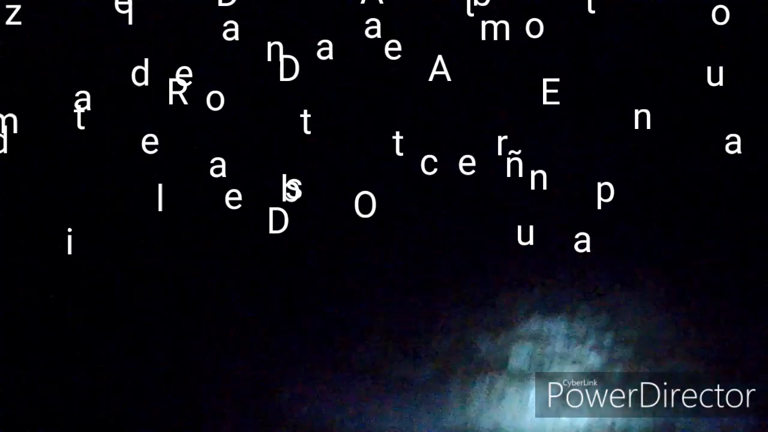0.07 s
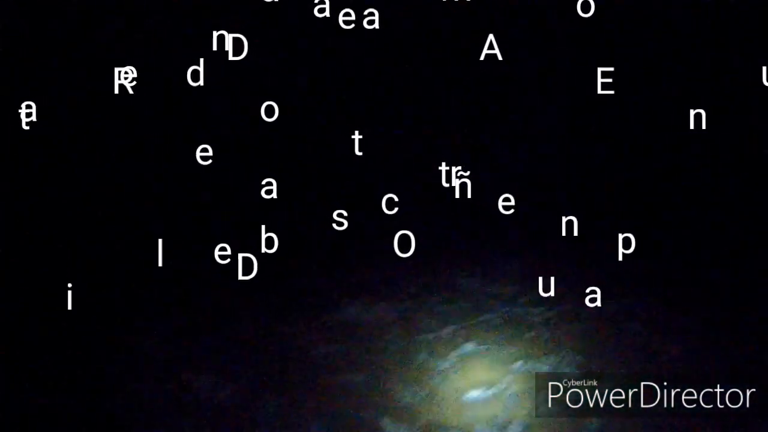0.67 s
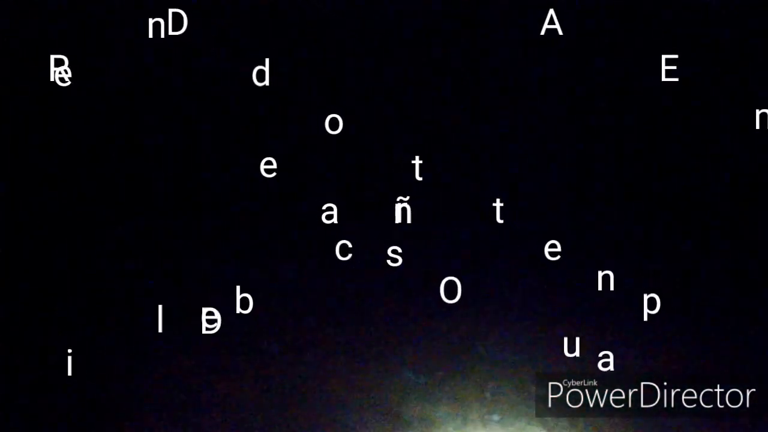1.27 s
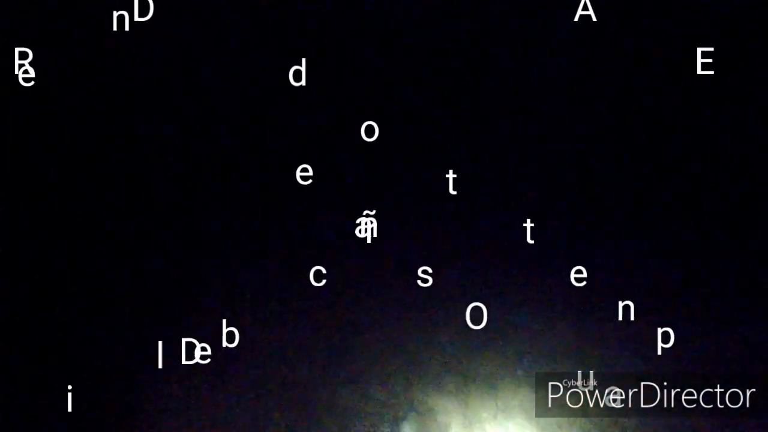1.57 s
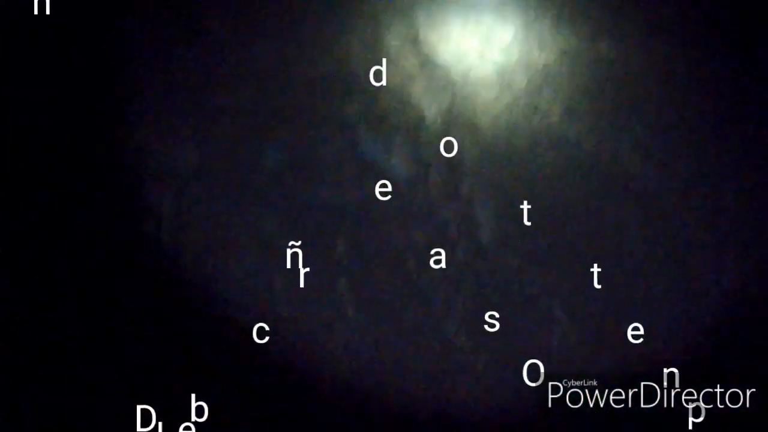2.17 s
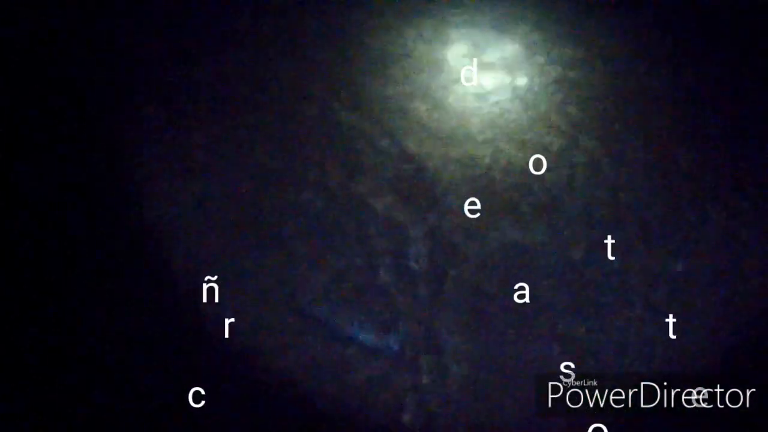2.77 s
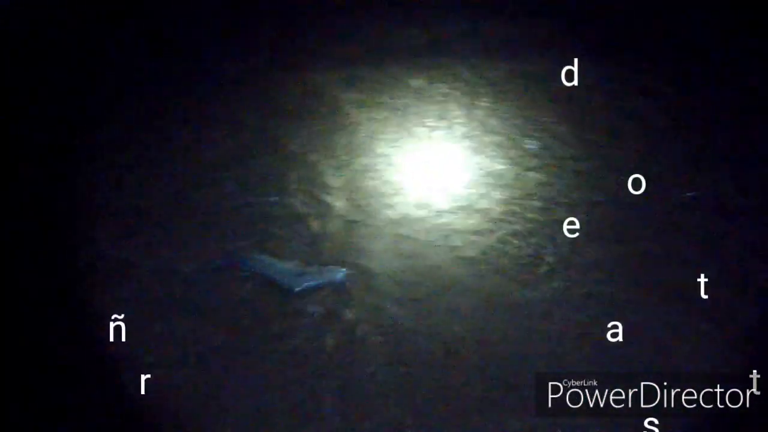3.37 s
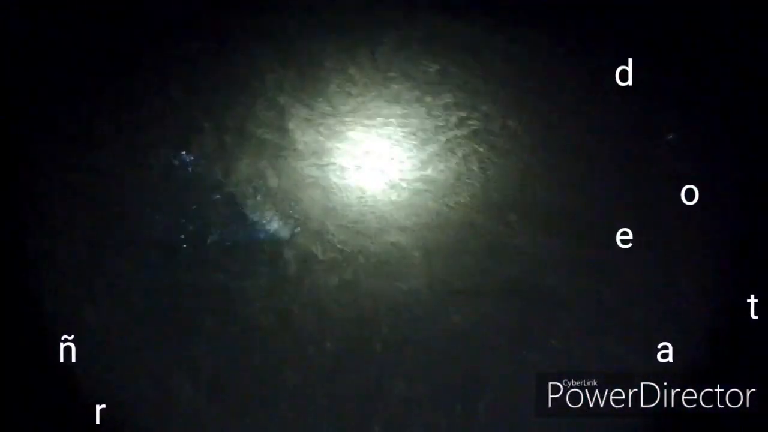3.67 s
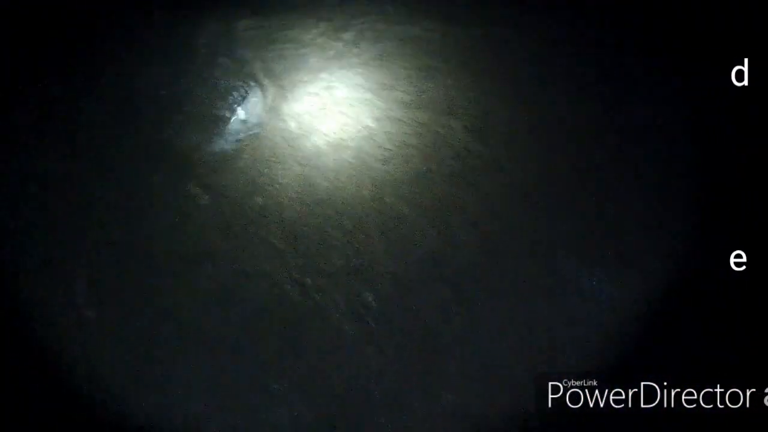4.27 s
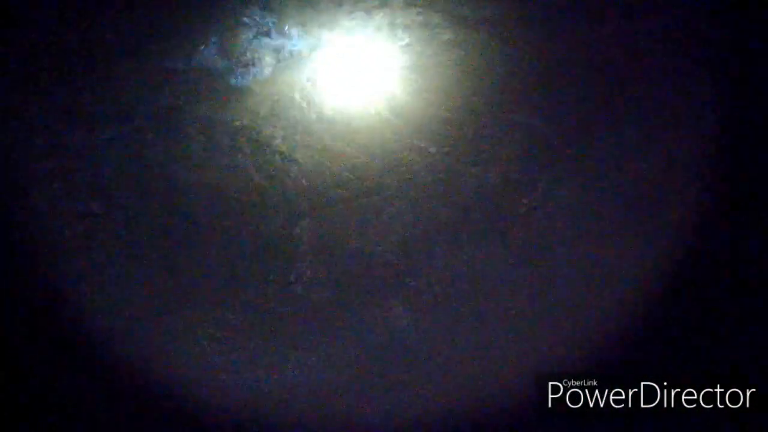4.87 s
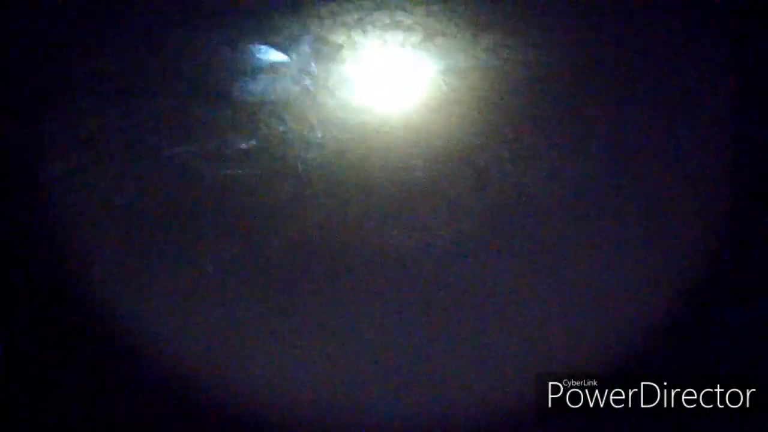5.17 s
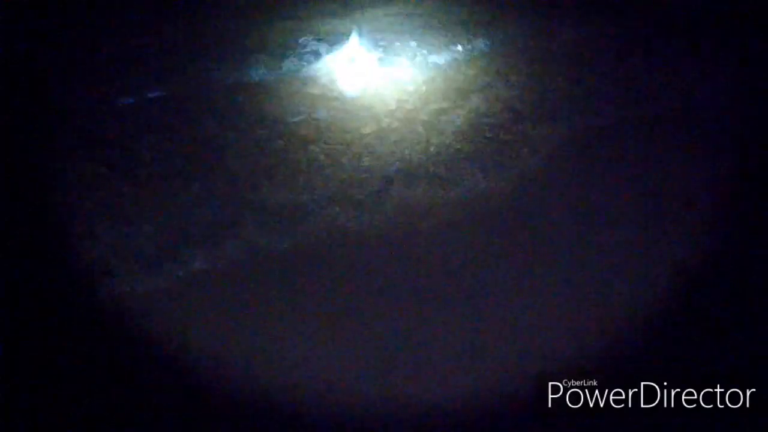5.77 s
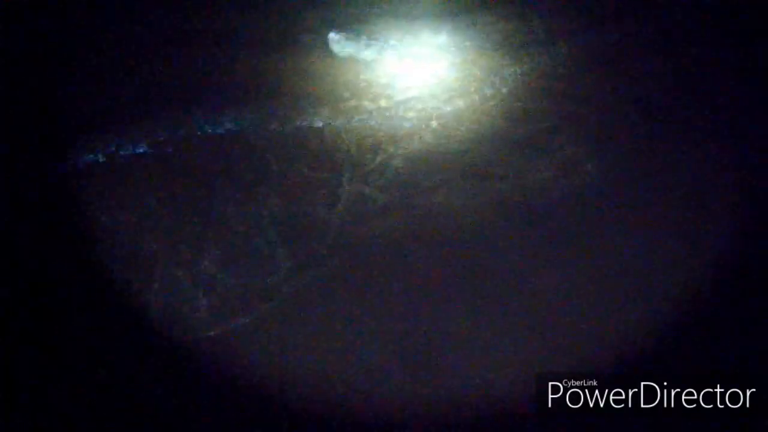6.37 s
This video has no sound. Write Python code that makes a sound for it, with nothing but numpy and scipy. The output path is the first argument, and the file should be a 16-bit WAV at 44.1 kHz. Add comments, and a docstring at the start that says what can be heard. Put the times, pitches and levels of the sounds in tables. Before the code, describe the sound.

Gentle surf on a beach at night, heard from inside a sealed plastic camera housing that muffles the highs. Small waves wash in, bubbling and plopping over a faint, steady roar of far breakers. The housing is then handled, giving a loud cluster of knocks and short juddering squeaks. Another brief rub with knocks follows. Softer waves keep lapping to the end, interrupted by two more knocks.

```python
"""Gentle surf on a night beach, heard inside a sealed plastic camera housing that muffles the treble.
Small waves wash in first, bubbling and plopping, over the steady roar of far breakers.
From 1.7 to 2.1 s the housing is handled: it knocks, and its slipping mount judders and squeals.
A limiter holds the loudest blows down. Another short rub and two knocks follow near 2.7 s.
Softer waves keep coming to the end, with two last knocks around 4.5 s."""
import sys
import numpy as np
from scipy import signal
from scipy.fft import rfft, irfft
from scipy.io import wavfile
from scipy.ndimage import uniform_filter1d, minimum_filter1d

SR = 44100
rng = np.random.default_rng(int(sys.argv[2]) if len(sys.argv) > 2 else 0)


def put_to_file(sound):
    """Save the sound as 16-bit audio at rate SR, in the file named by the first command-line argument."""
    columns = np.atleast_2d(sound).T  # one column per channel
    safe = np.clip(columns, -1, 1)
    whole_steps = np.round(safe * 32767)
    wavfile.write(sys.argv[1], SR, whole_steps.astype(np.int16))


N = 291501
T = np.arange(N) / SR

# small waves running up close by: (crest time [s], crest level [dB], build-up time [s])
NEAR_WAVES = [(0.14, -46, .35), (0.46, -38.5, 0.24), (1.7, -52, 1), (2.501, -53.5, .15), (2.9, -54.5, .25),
              (3.42, -47.5, .3), (4.85, -56.5, 0.86), (5.48, -52, 0.11), (5.8, -64, 0.22),
              (6.12, -52, 0.42)]
# tone of the shallows through the wall: (frequency [Hz], relative level [dB])
WASH_SPECTRUM = [(40, -55.5), (450, -25), (900, -11.5), (1080, -3), (1200, -4.5), (1340, 0), (1470, -3),
                 (1720, -26.5), (2400, -36.5), (3300, -37.5), (4300, -50), (5200, -70.5)]
# single large bubbles: (time [s], level [dB], pitch [Hz])
PLOP_EVENTS = [(0.214, -23, 1033), (0.222, -25.5, 1090), (0.341, -36, 1370), (0.493, -25.5, 1270),
               (1.577, -28.5, 1075), (1.766, -24.5, 1040), (3.372, -26, 1330), (3.507, -29.5, 1376),
               (3.568, -30, 1340), (3.855, -29.5, 886), (5.09, -36, 915), (6.15, -33, 740),
               (6.549, -35, 1610)]
# knocks on the housing, and the sharp release as the mount lets go at the end of a rub; # a ring time is how
# long a tone takes to fade by 60 dB: # (time [s], peak level [dB], pitch [Hz], ring time [s], relative snap
# [dB], relative thud [dB])
KNOCK_EVENTS = [(1.693, -30.5, 1070, .012, -9, -16), (1.7228, -24.5, 1380, 0.02, 12, -11),
                (1.7995, -9, 1060, 0.026, 13.5, -27), (1.8125, -9, 1290, .008, 8, -19),
                (1.8403, -12.5, 738, .015, 7.5, -11.5), (1.891, -15.5, 1157, .066, -1, -19),
                (2.061, -17.5, 1690, 0.055, 1, -26.5), (2.067, -14.5, 1160, 0.055, -23, -19.5),
                (2.6717, -18, 1340, 0.0097, 1, -10.5), (2.6835, -22, 943, 0.03, 11.5, -28),
                (4.4505, -12, 827, 0.022, -6.5, -34), (4.6075, -17.5, 932, 0.029, -3.5, -27.5)]
# the mount slips against the housing: (time [s], length [s], judder level [dB], judder pitch [Hz],
# squeal level [dB], squeal pitch [Hz], relative snap [dB], relative thud [dB])
RUB_EVENTS = [(1.7893, 0.016, -33, 897, -12, 825, -18.5, -9.5),
              (1.8143, 0.026, -18.5, 263.7, -17.5, 1291, -10, 0),
              (1.87, .02, -15, 811, -13, 1219, -10, -9.5),
              (2.0449, 0.019, -13.5, 795, -14.5, 1176, 11, -8.5),
              (2.664, .027, -40.5, 1270, -43, 986, 7, -13.5)]
# tones of the plastic shell: (pitch [Hz], relative level [dB], ring time [s])
SHELL_TONES = [(736, -7, 0.023), (968, -8, 0.048), (1160, -20, 0.057), (1357, -16.5, 0.046),
               (1690, -20.5, 0.048), (2900, -25.5, 0.02)]
# low tones of the whole case on its mount: (pitch [Hz], relative level [dB], ring time [s])
THUD_TONES = [(78, -25, 0.054), (154, -26, 0.31), (264.4, -2.5, 0.036), (289, -25.5, 0.33),
              (417, -1.5, 0.011), (529, -20, 0.11)]
# tone of the knocks and rubs, with strong mids, muffled treble and a faint fizz near 9.5 kHz:
# (frequency [Hz], relative level [dB])
HANDLING_SPECTRUM = [(30, -48), (90, -34.5), (200, -35), (570, -14.5), (680, -1.5), (1350, -1.5),
                     (1650, -10), (2200, -21.5), (2900, -29), (3500, -32), (4600, -45.5), (5300, -68),
                     (7200, -64), (9500, -51.5), (15000, -70.5)]
# tone of the far breakers through the wall: (frequency [Hz], relative level [dB])
ROAR_SPECTRUM = [(22, -44.5), (65, -31.5), (250, -16), (550, -5.5), (780, -1.5), (960, .5), (1150, -5),
                 (1400, -6.5), (1750, -17), (2400, -34), (2800, -38.5), (3500, -45.5), (4300, -51.5),
                 (5200, -74)]
# narrow bands where the sea leaks in more easily: (frequency [Hz], width [Hz], added level [dB])
WALL_RESONANCES = [(1370, 84, -11.5), (2120, 53, -7.5), (2810, 160, -1.5), (3317, 100, 2),
                   (4260, 260, -1.5)]

WAVE_BUILD_DB, WAVE_DRAIN_DB_PER_S = 11.5, 21   # rise over the build-up time; fall after the crest
RIPPLE_DB = -62   # the shallows between waves
JUDDER_S, JUDDER_RING_S, EASE_S = .0105, .011, .0071   # a rub takes EASE_S to stop
SQUEAL_SNAP_DB, SQUEAL_THUD_DB = 6.5, -9   # a squeal has more snap and less thud than a judder
SNAP_HZ, SQUEAL_SNAP_HZ, SNAP_RING_S = 2900, 4150, .009   # the shell's bright overtone
ROAR_DB, ROAR_EBB_DB_PER_S, ROAR_WAVE_DB = -50, 0.2046, -11.5   # the last is what near waves add
LIMIT_DB, RELEASE_DB_PER_S = -9.5, 713
HISS_DB, CUTOFF_HZ = -94.5, 15500


def wash(bubbles_per_s, size_db, ring_cycles, foam_db, lapping_db, pitch_count):
    """Small waves: bubbles of many sizes and pitches burst over the hiss of foam."""
    sizes = from_db(size_db * np.minimum(rng.exponential(1, N), 4))
    signs = rng.choice([-1, 1], N)
    bursts = sizes * signs * (rng.random(N) < bubbles_per_s / SR)
    pitch_index = rng.integers(0, pitch_count, N)
    pitches = np.geomspace(600, 3600, pitch_count)
    bubbles = sum(ring(bursts * (pitch_index == k), hz, ring_cycles / hz)
                  for k, hz in enumerate(pitches))
    water = unit_rms(bubbles) + from_db(foam_db) * rng.standard_normal(N)
    level = np.hypot(from_db(RIPPLE_DB), surge()) * from_db(lapping_db * drift(17))
    return level * unit_rms(colour(water, WASH_SPECTRUM))


def surge():
    """Strength of the near waves: each builds to its crest and drains away; their powers add."""
    power = 0
    for crest_s, db, build_s in NEAR_WAVES:
        building_db = WAVE_BUILD_DB * (crest_s - T) / build_s
        draining_db = WAVE_DRAIN_DB_PER_S * (T - crest_s)
        power += from_db(db - np.maximum(building_db, draining_db)) ** 2
    return np.sqrt(power)


def plops(gain_db, ring_cycles, rise, samples=2500):
    """A large bubble rings briefly, rising a little in pitch as it nears the surface."""
    out, t = np.zeros(N), np.arange(samples) / SR
    for start, db, hz in PLOP_EVENTS:
        age = t * hz / ring_cycles
        onset = 1 - np.exp(-(t * hz) ** 2)
        tone = np.sin(2 * np.pi * hz * t * (1 + rise * age))
        add(out, start, from_db(db + gain_db - 60 * age) * onset * tone)
    return out


def knocks(samples=14000):
    """Each hard touch, or the mount letting go at the end of a rub, gives the shell one sharp push."""
    out = np.zeros(N)
    for start, db, hz, ring_s, snap_db, thud_db in KNOCK_EVENTS:
        knock = housing(signal.unit_impulse(samples), hz, ring_s, snap_db, SNAP_HZ, thud_db,
                        direct_db=11.5, overtone_db=-3.5, tones_db=-3.0)
        add(out, start, from_db(db) * knock / np.abs(knock).max())
    return out


def rubs(jitter, grit_db, samples=14000):
    """Each rub starts as a heavy judder and turns into a short squeal as the mount breaks free."""
    out = np.zeros(N)
    for time, length, judder_db, judder_hz, squeal_db, squeal_hz, snap_db, thud_db in RUB_EVENTS:
        judder = (time, JUDDER_S, judder_db, judder_hz, snap_db, SNAP_HZ, thud_db)
        squeal = (time + JUDDER_S, length - JUDDER_S, squeal_db, squeal_hz,
                  snap_db + SQUEAL_SNAP_DB, SQUEAL_SNAP_HZ, thud_db + SQUEAL_THUD_DB)
        for start, span, db, hz, *snap_and_thud in (judder, squeal):
            force = slips(span, hz, jitter, grit_db, samples)
            rub = housing(force, hz, JUDDER_RING_S, *snap_and_thud,
                          direct_db=27.5, overtone_db=0, tones_db=-7.5)
            strength = np.sqrt(np.sum(rub ** 2) / (span * SR))
            add(out, start, from_db(db) * rub / strength)
    return out


def slips(length, hz, jitter, grit_db, samples):
    """The mount sticks and slips: uneven tugs with grit between them, easing off as it comes to rest."""
    gaps, grit = rng.standard_normal((2, samples))
    slip_times = np.cumsum(np.exp(jitter * gaps) / hz)
    tugs = np.histogram(slip_times - slip_times[0], samples, (0, samples / SR))[0]
    friction = tugs + from_db(grit_db) * grit
    pressure = np.clip(.5 + (length - np.arange(samples) / SR) / EASE_S, 0, 1)
    return (friction - np.average(friction, weights=pressure)) * pressure


def housing(force, contact_hz, ring_s, snap_db, snap_hz, thud_db, direct_db, overtone_db, tones_db):
    """A push rings the touched spot and the shell; a hard one snaps, a heavy one rocks the case."""
    shell_tones = sum(from_db(db) * ring(force, hz, fade_s) for hz, db, fade_s in SHELL_TONES)
    tone = ring(force, contact_hz, ring_s) + from_db(tones_db) * shell_tones
    snap = from_db(direct_db) * force + from_db(overtone_db) * ring(force, snap_hz, SNAP_RING_S)
    touch = colour(tone + from_db(snap_db) * snap, HANDLING_SPECTRUM)
    rocking = sum(from_db(db) * ring(force, hz, fade_s) for hz, db, fade_s in THUD_TONES)
    thud = signal.sosfilt(signal.butter(4, [50, 650], "band", fs=SR, output="sos"), rocking)
    return unit_rms(touch) + from_db(thud_db) * unit_rms(thud)


def breakers(swell_db, flutter_db):
    """Far surf: a slowly ebbing roar whose lows and highs waver separately; near waves add body."""
    low, high = rng.standard_normal((2, N))
    low = signal.sosfilt(signal.butter(2, 900, "low", fs=SR, output="sos"), low)
    high = signal.sosfilt(signal.butter(2, 900, "high", fs=SR, output="sos"), high)
    roar = sum(part * from_db(swell_db * drift(6.5) + flutter_db * drift(49)) for part in (low, high))
    level = np.hypot(from_db(ROAR_DB - ROAR_EBB_DB_PER_S * T), from_db(ROAR_WAVE_DB) * surge())
    return level * unit_rms(colour(roar, ROAR_SPECTRUM))


def wall(sea):
    """The housing wall resonates, lifting a few narrow bands of the sea's sound."""
    return sea + sum(from_db(db) * signal.lfilter(*signal.iirpeak(hz, hz / width, fs=SR), sea)
                     for hz, width, db in WALL_RESONANCES)


def ring(force, hz, ring_s):
    """Each push starts a tone that fades by 60 dB in ring_s seconds."""
    decay, angle = from_db(-60 / (ring_s * SR)), 2 * np.pi * hz / SR
    return signal.lfilter([.5, 0, -.5], [1, -2 * decay * np.cos(angle), decay * decay], force + 1e-18)


def colour(sound, spectrum):
    """Shape lows and highs to follow a table, with no echo ahead of the sound (minimum phase)."""
    size = 8192
    hz, db = np.transpose(spectrum)
    log_hz = np.log(np.fft.rfftfreq(size, 1 / SR) + 1)
    gain = from_db(np.interp(log_hz, np.log(hz), db))
    cepstrum = irfft(np.log(gain))[:size // 2]
    cepstrum[1:] *= 2   # one half, doubled, puts all ringing after the push
    click_response = irfft(np.exp(rfft(cepstrum, size)))
    return signal.fftconvolve(sound, click_response)[:len(sound)]


def drift(rate_hz):
    """A smooth random wobble, typically about 1 in size."""
    step, warm_up = 40, 2000   # one random value every 40 samples
    decay = np.exp(-2 * np.pi * step * rate_hz / SR)
    noise = rng.standard_normal(N // step + warm_up + 2)
    slow = signal.lfilter([1], [1, -2 * decay, decay * decay], noise)[warm_up:]
    return np.interp(np.arange(N) / step, np.arange(len(slow)), unit_rms(slow))


def from_db(db):
    """Turn decibels into a multiplier."""
    return 10 ** (np.asarray(db) / 20)


def unit_rms(sound):
    """Scale a sound to an average strength (rms) of 1."""
    return sound / np.sqrt(np.mean(sound ** 2) + 1e-20)


def add(out, start_s, sound):
    """Mix a sound in at its time."""
    start = round(start_s * SR)
    out[start:start + len(sound)] += sound[:N - start]


def scene():
    """The sea outside and the handling of the shell, in one channel."""
    far = breakers(swell_db=0.5, flutter_db=1.05)
    near = wash(bubbles_per_s=1100, size_db=1.5, ring_cycles=18, foam_db=1,
                lapping_db=0.5, pitch_count=28)
    sea = wall(near + far) + plops(gain_db=-2, ring_cycles=29, rise=0.029)
    return (sea + knocks() + rubs(jitter=0.16, grit_db=-24.5))[None]


def record(dry):
    """A fast limiter turns loud blows down; circuits hiss faintly; the highest treble is cut."""
    over_db = np.maximum(20 * np.log10(np.abs(dry[0]) + 1e-9) - LIMIT_DB, 0)
    # the volume recovers at a steady rate after each peak
    held_db = np.maximum.accumulate(over_db + RELEASE_DB_PER_S * T) - RELEASE_DB_PER_S * T
    # and glides down just ahead of the next one
    gain_db = minimum_filter1d(-held_db, size=61)
    gain_db = uniform_filter1d(uniform_filter1d(gain_db, size=31), size=31)
    out = dry * from_db(gain_db) + from_db(HISS_DB) * rng.standard_normal(N)
    return signal.sosfilt(signal.ellip(10, .1, 80, CUTOFF_HZ, fs=SR, output="sos"), out)


dry = scene()
out = record(dry)
put_to_file(out)
```